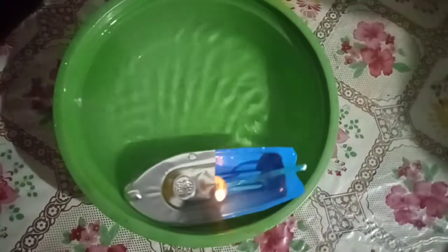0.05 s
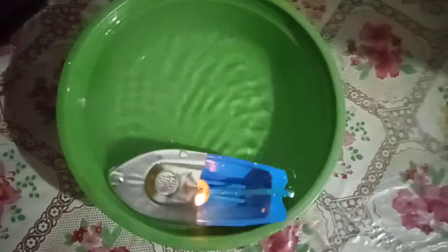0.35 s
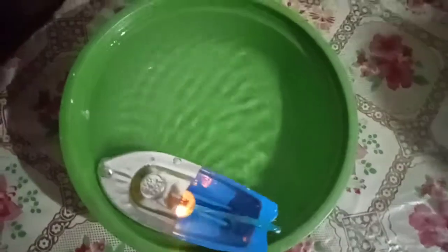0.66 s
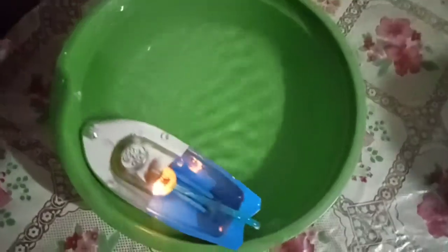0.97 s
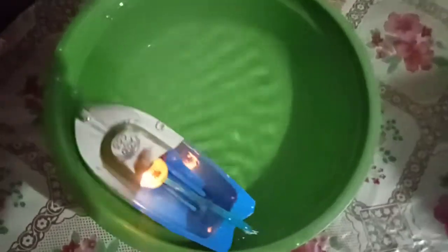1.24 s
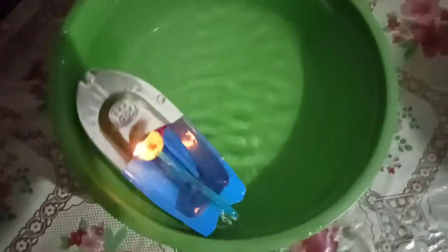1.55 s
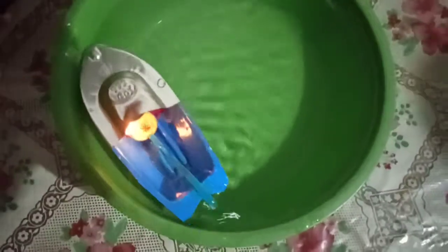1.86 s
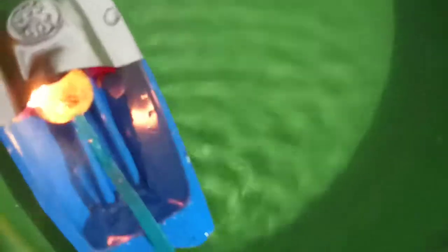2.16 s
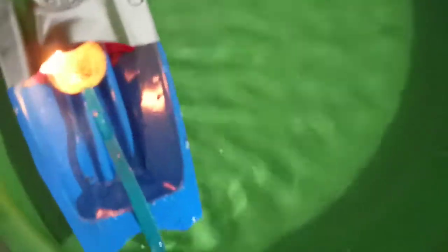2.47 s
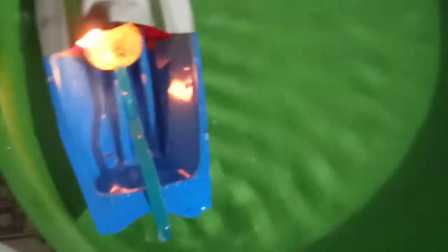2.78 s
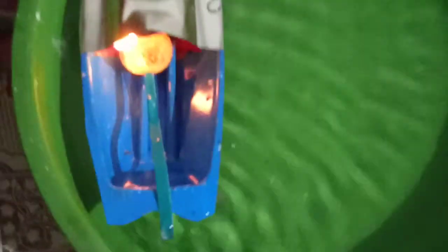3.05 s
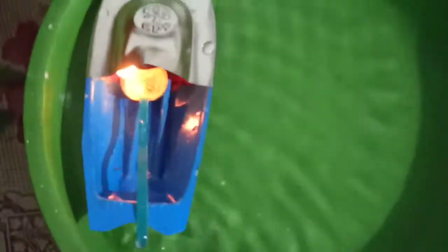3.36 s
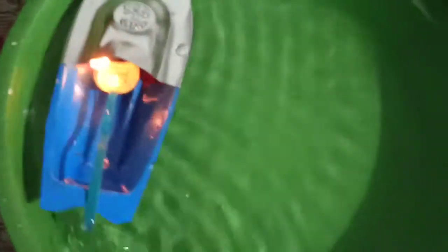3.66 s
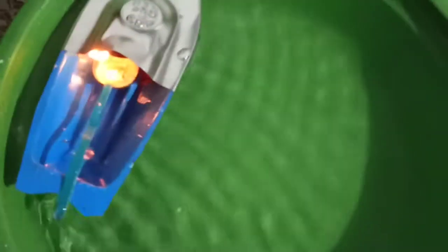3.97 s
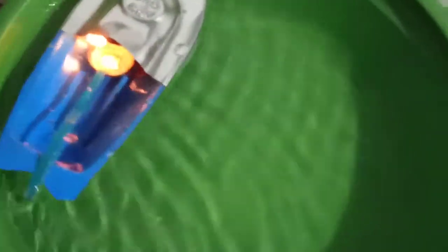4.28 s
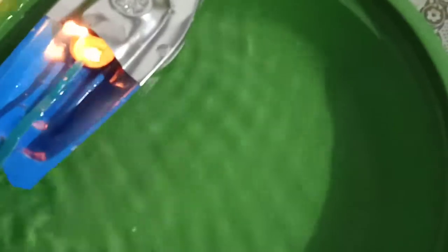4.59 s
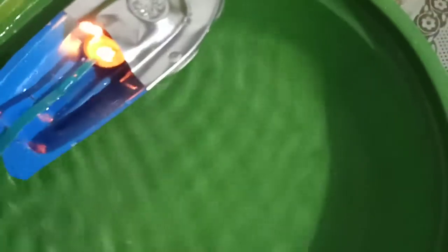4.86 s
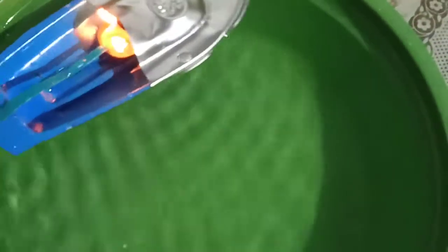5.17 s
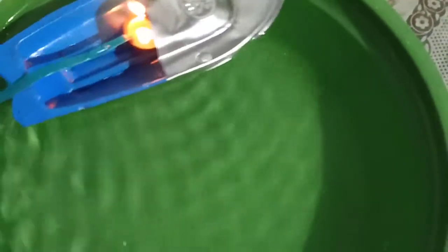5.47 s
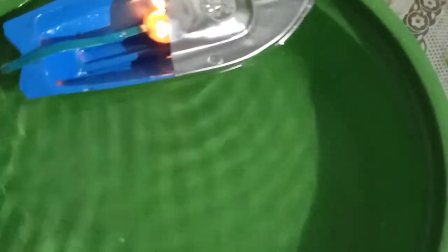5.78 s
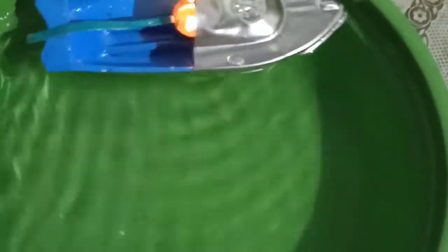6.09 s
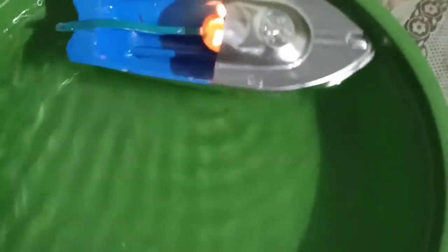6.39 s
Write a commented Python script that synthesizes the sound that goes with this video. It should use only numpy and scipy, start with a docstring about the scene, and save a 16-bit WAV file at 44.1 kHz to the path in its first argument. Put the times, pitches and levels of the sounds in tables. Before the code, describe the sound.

A small tin steam boat putters around a plastic basin of water, its thin boiler lid snapping in and out about fifteen times a second. The clatter is bright, crinkly and almost without bass, running throughout with slight changes in pace and tone. A few faint, dull bumps come in the first half. The microphone is close, in a small, quiet room with a light echo.

```python
"""A tin pop-pop boat circles a plastic basin of water on a table, close under a phone in a small room.
Steam bulges the boiler's foil lid and sucks it back about 15 times a second. Each flip is a snap-through
buckling: a short snap, then a bright crinkle as the rest of the foil gives way. The hull resonates, basin
and room reverberate; beneath lie a faint sizzle, a few dull bumps, a low rustle and mains hum."""
import sys
import numpy as np
from scipy import signal
from scipy.fft import rfft, irfft
from scipy.io import wavfile
from scipy.ndimage import uniform_filter1d

SR = 44100
rng = np.random.default_rng(int(sys.argv[2]) if len(sys.argv) > 2 else 0)


def wrap_up_sound(samples):
    """Save the sound to the file named by the first command line argument, as 16-bit audio."""
    columns = np.atleast_2d(samples).T
    # keep every value between -1 and 1, then stretch to whole-number steps
    tamed = np.clip(columns, -1, 1)
    steps = np.round(tamed * 32767).astype(np.int16)
    wavfile.write(sys.argv[1], SR, steps)


N = 283563
TIME = np.arange(N) / SR


# Spectrum of the crinkling foil. Each row: frequency in Hz, gain in dB.
FOIL_SPECTRUM = [(200, -42), (550, -20.5), (720, -7.5), (1100, 2.5), (1600, 7.5), (2300, 1.5), (2850, -1.5),
                 (3700, 0), (4900, -5), (6000, 0.5), (9600, -2.5), (10700, -11.5), (13000, -9),
                 (15500, -17.5)]
# Resonances of lid and hull. Each row: frequency in Hz, width in Hz, gain in dB.
HULL_MODES = [(722.4, 21, 8), (850, 143, -3), (983, 17, -3.5), (1438, 43, 4), (1483, 27, 5), (1501, 21, 1),
              (2013, 44, 7.5), (2280, 26, -1.5), (3190, 26, -2.5), (3626, 205, 3.5), (3803, 320, 6.5),
              (4560, 60, -0.5), (4720, 214, 6), (5977, 236, 7.5), (6360, 72, 1), (6730, 170, -3.5),
              (6940, 79, 6), (7160, 130, -10), (7300, 58, 9), (7530, 63, 5), (7980, 280, -3.5),
              (8290, 160, 7.5), (8590, 370, -4.5), (9160, 150, 4.5), (9660, 250, 3), (11320, 250, 6),
              (14650, 470, 11)]

def boat():
    """Source and filter: snaps and crinkles excite the resonances of the tin hull."""
    snaps, crinkles = boiler()
    radiated = band(snaps, 690, 12000, order=6)  # so small a lid radiates almost no bass
    return colour(radiated + colour(crinkles, FOIL_SPECTRUM), modes=HULL_MODES)


# The snap over time: its pitch drifts, and the flutter moves from after to before the core as the boat circles.
# Each row: time in seconds, snap pitch in Hz, flutter lag in seconds.
LID_TUNING = [(0, 1553, -0.00034), (.7, 1640, 0.00077), (2.5, 1598, 0.0013), (3.2, 1553, 0.00063),
              (3.8, 1580, -0.00055), (5.2, 1570, 0.0014), (6.43, 1563, -0.000047)]

def boiler(snap_db=24, crinkle_db=29, knock_db=-10, knock_lead_s=0.001807, split_hz=5000, glint_hz=10300):
    """Snap-through buckling: each flip of the lid snaps, jolts the hull and crinkles the foil."""
    snaps, broad, fine, tiny = np.zeros((4, N))
    for s, bulge, db, lag_s, foil_db in strokes():
        hz, trail_s = read(LID_TUNING, s)
        add_centred(snaps, s, undb(db) * flip(hz, 0.7 if bulge else 0.65, trail_s))
        add_centred(snaps, s + lag_s - knock_lead_s, undb(foil_db + knock_db) * knock())
        # foil that gives way hard on a bulge strikes the tightened lid a second time
        restrike = bulge * undb(foil_db + 25) * flip(hz * 1.257, 0.17, trail_s)
        for layer, x in zip((snaps, broad, fine, tiny), (restrike, *crinkle(foil_db))):
            add_centred(layer, s + lag_s, undb(foil_db) * x)
    foil = band(broad, 166, split_hz, order=3) + band(fine, split_hz, glint_hz, order=4)
    foil += band(tiny, glint_hz, SR / 2, order=4)
    return undb(snap_db) * snaps, undb(crinkle_db) * foil


# Push of the steam as the flame flickers. Each row: time in seconds, relative level in dB.
STEAM_PUSH = [(0, -5.3), (.25, 1.86), (.37, -2.5), (.78, 0.7), (1.1, -2.5), (1.3, 0.9), (1.45, -1.4),
              (2.3, 0), (2.6, 2), (3.13, 2.5), (3.27, -5.5), (3.6, -1.06), (3.85, 1.2), (4.7, 0.8),
              (5, 1.8), (5.28, 2.2), (5.42, -4), (5.85, 1), (6.4, -1.45)]
# Strength of the crinkle. Each row: time in seconds, relative level in dB.
FOIL_LEVEL = [(0, 2), (.55, 0.4), (.96, -0.3), (1.33, 3.5), (1.48, 0.3), (2.28, 0), (2.55, 2.5),
              (3.1, 1.65), (3.5, -1), (3.75, -0.4), (4.2, 0.6), (4.66, -1.8), (5.27, 1.4), (5.44, -2),
              (5.8, -.6), (6.4, 0)]
# Cycles short of steam. Each entry: approximate time in seconds.
MISFIRE_TIMES = [.909, 2.569, 2.698, 2.825, 2.951]
# Relative levels of a misfire in dB: bulge snap, return snap, bulge crinkle, return crinkle.
MISFIRE_LEVELS = (-16.5, -27, -36, -29)

def strokes(usual_cycle_s=.0655, uneven_db=0.86, jitter_s=.0003, stumble_s=.0023, return_lag_s=.002):
    """Pressure drives the lid out and back; yields time, is-bulge, snap dB, crinkle lag, crinkle dB."""
    times = cycle_times()
    misfires = {np.argmin(abs(times - s)) for s in MISFIRE_TIMES}
    for k, (s, chance) in enumerate(zip(times, rng.standard_normal((len(times), 5)))):
        steam, foil = read(STEAM_PUSH, s)[0], read(FOIL_LEVEL, s)[0]
        slack_s = 1 / read(CYCLE_RATE, s)[0] - usual_cycle_s
        hold_s = .0327 + .2 * slack_s + jitter_s * chance[4]  # the lid stays out longer in slow cycles
        out_snap, out_foil = accent(s)
        back_snap, back_foil = accent(s + hold_s)
        # on a bulge the foil gives way later with more steam and in slow cycles
        lag_s = max(.0039 + .00035 * (steam + out_snap) + .25 * slack_s, 0)
        # the bulge snaps harder; the return crinkles more and feels the steam less
        levels = np.array([-17.5 + steam + out_snap, -21.5 + 0.27 * steam + back_snap,
                           -26.5 + foil + out_foil, -23.5 + foil + back_foil])
        if k in misfires:  # comes late, falls back early and hardly crinkles
            s, hold_s, levels = s + stumble_s, .0252, MISFIRE_LEVELS
        elif k - 1 in misfires:  # comes early; the foil holds out longer, then gives way harder
            s, lag_s = s - stumble_s, lag_s + .0035
            levels[2] += 2.5
        out_db, back_db, out_foil_db, back_foil_db = levels + uneven_db * chance[:4]
        yield s, True, out_db, lag_s, out_foil_db
        yield s + hold_s, False, back_db, return_lag_s, back_foil_db


# Pace of the engine. Each row: time in seconds, steam cycles per second.
CYCLE_RATE = [(0.0, 16.32), (0.45, 14.95), (0.86, 14.64), (0.91, 15.45), (1.44, 14.64), (1.6, 15.84),
              (1.95, 15.57), (2.0, 14.85), (2.34, 14.37), (2.88, 16.19), (3.2, 15.1), (3.52, 16.28),
              (3.71, 15.64), (3.81, 14.31), (4.15, 14.54), (4.28, 15.74), (4.86, 14.87), (5.2, 15.69),
              (5.76, 15.01), (6.4, 15.25)]

def cycle_times(first_bulge_s=0.0504):
    """Phase is the integral of frequency: the lid bulges at each whole steam cycle."""
    clock = np.arange(-SR // 10, N + SR // 10) / SR
    turns = np.cumsum(read(CYCLE_RATE, clock)[0]) / SR
    turns -= np.interp(first_bulge_s, clock, turns)
    return np.interp(np.arange(-1, int(turns[-1])), turns, clock)


# Extra hard flips. Each row: time in seconds, snap boost in dB, crinkle boost in dB.
HARD_FLIPS = [(.806, 4.5, 2), (.84, 2, 5), (.876, 1, 2.5), (1.17, 3, .5), (1.371, 2, -1.5), (1.922, 4.5, 0),
              (2.156, 2.5, -0.5), (2.431, 3, 0.5), (3.711, 3, 2.5), (3.95, 5, 0.5), (4.321, 1.5, 1),
              (4.449, 2.5, 4.5)]

def accent(s, within_s=.015):
    """Amplitude follows excitation: the dB added to snap and crinkle if this flip is a hard one."""
    return next((row[1:] for row in HARD_FLIPS if abs(row[0] - s) < within_s), (0, 0))


def flip(hz, flutter_gain, trail_s, core_s=0.00059, flutter_s=0.0017, rise=0.083, rise_s=0.0012):
    """Tension raises pitch: the tightening lid swings a few strong cycles amid a longer, weaker flutter."""
    t = np.arange(-512, 512) / SR
    detune, late, strength, length, slip = rng.standard_normal(5)
    pitch = hz * np.exp(0.028 * detune + rise * np.tanh(t / rise_s))
    phase = 2 * np.pi * (np.cumsum(pitch) - np.sum(pitch[t < 0])) / SR
    core = np.sin(phase) * gaussian(t, core_s)
    envelope = gaussian(t - trail_s - 0.00081 * late, flutter_s * np.exp(0.29 * length))
    flutter = np.sin(phase + np.pi / 3 + slip) * envelope  # the rim is out of step with the middle
    return unit(core + flutter_gain * np.exp(0.28 * strength) * flutter)


def knock(hz=960, width_s=0.00067):
    """Recoil: each flip jolts the hull into one low swing, alike every time."""
    t = np.arange(-256, 256) / SR
    return unit(np.sin(2 * np.pi * hz * t) * gaussian(t, width_s))


def crinkle(db, usual_db=-24):
    """Buckling on three scales: broad buckles rattle on, fine ones end sooner, tiny ones glint."""
    fine_db, glint_db = rng.standard_normal(2) * (1.7, 1.3)
    broad = buckles(rise_s=.0018, fall_s=.004, grain_db=1.5, count=100)
    fine = buckles(rise_s=.001, fall_s=.0022, grain_db=3.5, count=50)
    tiny = buckles(rise_s=.001, fall_s=.0019, grain_db=1.3, count=90, late_s=.001)
    return broad, fine * undb(fine_db), tiny * undb(db - usual_db + glint_db)  # harder is brighter


def buckles(rise_s, fall_s, grain_db, count, late_s=0, size=2048):
    """Crackling noise: impulses of uneven size come thick and fast, then thin out."""
    at = late_s + rise_s * (rng.standard_normal(count) - 1) + fall_s * rng.exponential(size=count)
    sizes = undb(grain_db * np.minimum(rng.exponential(size=count), 3)) * rng.choice([-1, 1], count)
    out = np.zeros(size)
    np.add.at(out, np.clip(size // 2 + at * SR, 0, size - 1).astype(int), sizes)
    return unit(out)


def sizzle(db=-57, lo_hz=9000, grain_db=-2.0):
    """Boiling noise: countless tiny bursts of uneven size fizz faintly in the hot boiler."""
    bursts = rng.standard_normal(N) * undb(grain_db * np.minimum(rng.exponential(size=N), 4))
    return undb(db) * unit(band(bursts, lo_hz, 20000)) * np.sqrt(N)


# Hull resonances that beam one way. Each row: centre time in seconds, half span in seconds,
# frequency in Hz, width in Hz, gain at the centre time in dB.
HULL_BEAMS = [(0, 2, 5500, 280, 7), (.1, 1, 1100, 220, -7), (1.4, 0.82, 2430, 260, 5),
              (1.8, 1.5, 3020, 350, -5), (2, 1.28, 3790, 400, 5.5), (2.7, 0.56, 2170, 240, 5),
              (2.9, 1.3, 14600, 1800, 3.5), (3.9, 2.3, 8200, 410, 4), (4.6, 1.9, 1920, 160, 4),
              (4.7, 1.5, 3110, 260, 6), (4.75, 1.3, 3640, 483, -11.5), (6.2, 1.1, 4750, 400, 4.5),
              (6.1, 0.94, 2700, 660, 5)]

def turning(x):
    """Directivity: one resonance after another swells or fades as the hull swings past the phone."""
    for s, span_s, hz, width_hz, db in HULL_BEAMS:
        facing = np.cos(np.pi / 2 * np.clip((TIME - s) / span_s, -1, 1)) ** 2
        x = x + (undb(db * facing) - 1) * band(x, hz - width_hz / 2, hz + width_hz / 2, order=1)
    return x


def reflections(x, basin_db=-7, room_db=-8.5, positions=18):
    """Reverberation depends on position: the echoes of basin and room change as the boat moves round."""
    # the shallow bowl colours what it throws back
    thrown = colour(x, [(750, 0.5), (1150, -5.5), (1600, -1), (3500, 1), (9000, 1), (11500, 3),
                        (15000, -13)])
    out = 0
    for k in range(positions):
        nearness = np.cos(np.pi / 2 * np.clip(TIME / TIME[-1] * (positions - 1) - k, -1, 1))
        basin = undb(basin_db) * diffuse_tail(t60_s=0.12, delay_s=0.0011, build_s=0.0071)
        room = undb(room_db) * diffuse_tail(t60_s=0.53, delay_s=0.01, build_s=0.0087)
        out = out + signal.oaconvolve(thrown * nearness, basin + room)
    add(out, 0, out[N:].copy())  # the boat is already running, so the last ring wraps to the start
    return out[:N]


def diffuse_tail(t60_s, delay_s, build_s, smooth_hz=80, size=16384):
    """A diffuse field: dense reflections build up and decay, with even energy across the spectrum."""
    t = np.maximum(np.arange(size) / SR - delay_s, 0)
    envelope = (1 - np.exp(-t / build_s)) * undb(-60 * t / t60_s)
    spectrum = rfft(rng.standard_normal(size) * envelope, 2 * size)
    power = uniform_filter1d(np.abs(spectrum) ** 2, int(smooth_hz * 2 * size / SR))
    return unit(irfft(spectrum / np.sqrt(np.abs(power) + 1e-12))[:size] * (t > 0))


# Dull bumps against the basin. Each row: start in seconds, level in dB, pitch in Hz,
# time scale in seconds, level of the table's boom in dB.
BASIN_BUMPS = [(0.291, -51, 292, 0.073, -66), (.53, -51.5, 249, .2, -49), (1.132, -57, 255, .15, -57.5),
               (1.6, -49, 292, 0.065, -61), (2.178, -46, 262, 0.08, -68)]

def bumps(overtone=1.85, overtone_db=-11, boom_hz=126, boom_lag_s=.07, boom_s=0.24):
    """Structure-borne sound: each bump excites the basin and an overtone, then the table under it."""
    out = np.zeros(N)
    for s, db, hz, scale_s, boom_db in BASIN_BUMPS:
        add(out, s, thud(db, hz, scale_s) + thud(db + overtone_db, hz * overtone, scale_s))
        add(out, s + boom_lag_s, thud(boom_db, boom_hz, boom_s))
    return out


def thud(db, hz, scale_s, width=0.16):
    """A damped resonance: a low, narrow band of noise swells and fades."""
    age = np.arange(int(2 * scale_s * SR)) / (scale_s * SR)
    noise = band(rng.standard_normal(len(age)), hz / (1 + width), hz * (1 + width))
    return unit(noise * age * np.exp(-4 * age)) * undb(db) * np.sqrt(scale_s * SR)


# Spectrum of the room's rustle. Each row: frequency in Hz, relative level in dB.
RUSTLE_SPECTRUM = [(25, -16), (45, -9), (65, -5.5), (130, -2), (280, 0.5), (450, -4), (1000, -26),
                   (4000, -2), (16000, -35)]
# Course of the rustle. Each row: time in seconds, level in dB.
RUSTLE_LEVEL = [(0, -48.5), (.7, -50.5), (1.5, -51.5), (2.5, -52.5), (3.1, -51.5), (3.7, -52.5),
                (4.6, -55.5), (5.7, -54), (6.2, -53)]

def room_air(hum_hz=120, hum_db=-71, sway_db=2):
    """The ambient noise floor: a faint low rustle that comes and goes, and wavering mains hum."""
    rustle = unit(colour(rng.standard_normal(N), RUSTLE_SPECTRUM)) * np.sqrt(N)
    sway = np.interp(TIME, np.arange(64) / 8, rng.standard_normal(64))
    hum = undb(hum_db + sway_db * sway) * np.sqrt(2) * np.sin(2 * np.pi * hum_hz * TIME)
    return rustle * undb(read(RUSTLE_LEVEL, TIME)[0]) + hum


def colour(x, points=((1, 0), (SR, 0)), modes=(), size=8192):
    """Minimum-phase filtering by a smooth spectrum of (Hz, dB) points and a set of resonances."""
    f = np.arange(size // 2 + 1) * SR / size
    hz, db = np.transpose(points)
    db = np.interp(np.log(f + 1), np.log(hz), db)
    db += sum(lift / (1 + (2 * (f - centre) / width) ** 2) for centre, width, lift in modes)
    cepstrum = irfft(np.log(undb(db)))[:size // 2]
    cepstrum[1:] *= 2
    return signal.fftconvolve(x, irfft(np.exp(rfft(cepstrum, size))))[:N]


def band(x, lo_hz, hi_hz, order=2):
    """Band-pass filtering."""
    sos = signal.butter(order, [lo_hz, min(hi_hz, SR / 2 - 1)], "band", fs=SR, output="sos")
    return signal.sosfilt(sos, x)


def gaussian(t, width_s):
    """A bell-shaped envelope."""
    return np.exp(-.5 * (t / width_s) ** 2)


def undb(db):
    """Decibels to amplitude ratio."""
    return 10 ** (np.asarray(db) / 20)


def read(table, at):
    """Linear interpolation of a table's columns at the given times."""
    s, *columns = np.transpose(table)
    return np.array([np.interp(at, s, c) for c in columns])


def unit(x):
    """Normalisation to energy 1."""
    return x / np.sqrt(np.sum(x ** 2) + 1e-18)


def add(out, s, x):
    """Superposition of x on out from time s."""
    i = int(round(s * SR))
    a, b = max(i, 0), min(i + len(x), len(out))
    if b > a:
        out[a:b] += x[a - i:b - i]


def add_centred(out, s, x):
    """Superposition of x on out, centred on time s."""
    add(out, s - len(x) / SR / 2, x)


def scene():
    """Superposition: the boat's direct sound and its echoes, over the bumps and the quiet room."""
    direct = turning(boat() + sizzle())
    return (direct + reflections(direct) + bumps() + room_air())[None]


def record(dry):
    """Band limiting: the phone cuts the treble steeply above 16.1 kHz."""
    return signal.sosfilt(signal.ellip(10, .2, 80, 16100, fs=SR, output="sos"), dry)


dry = scene()
out = record(dry)
wrap_up_sound(out)
```